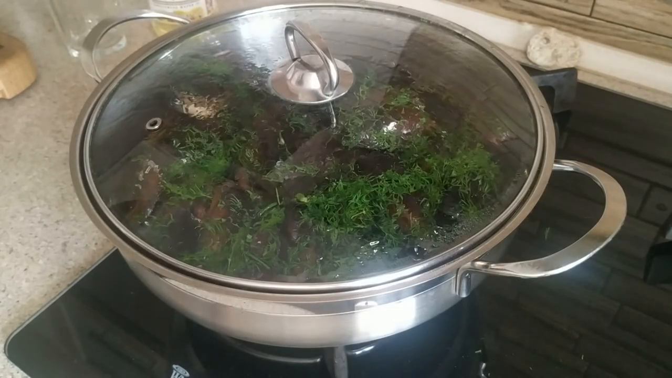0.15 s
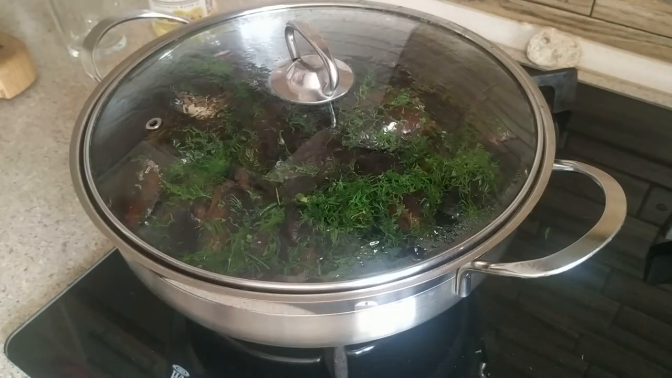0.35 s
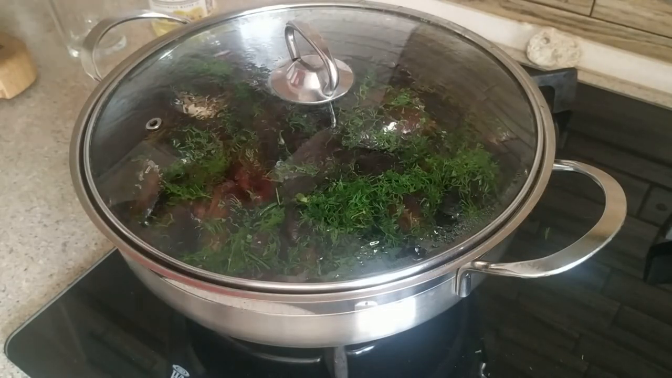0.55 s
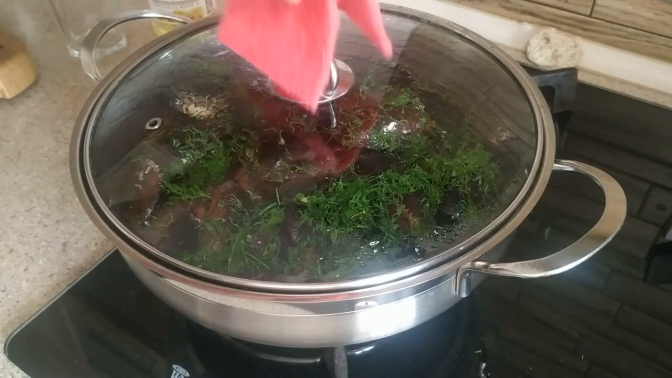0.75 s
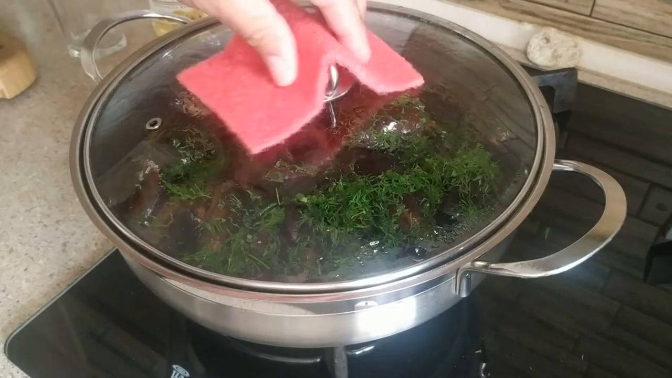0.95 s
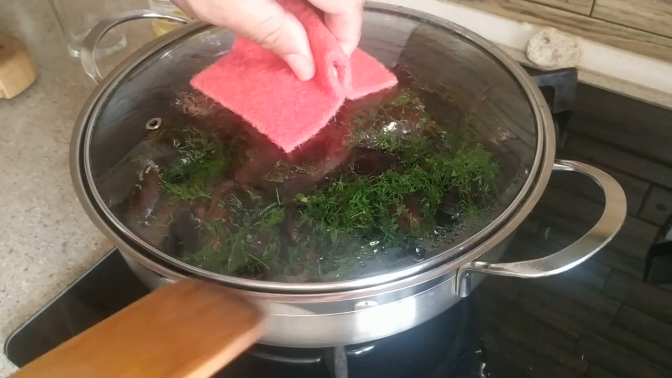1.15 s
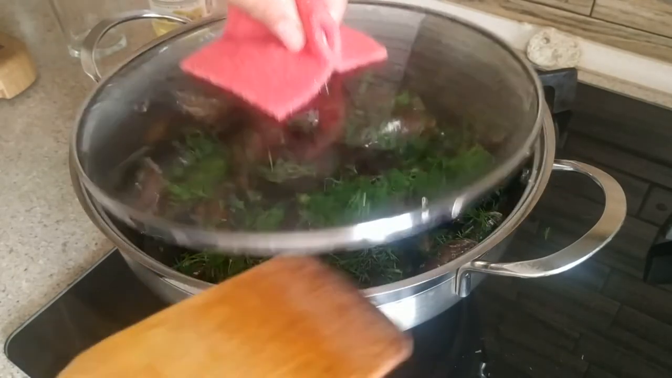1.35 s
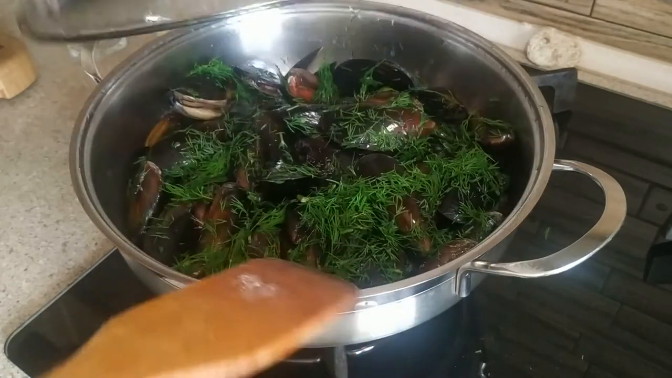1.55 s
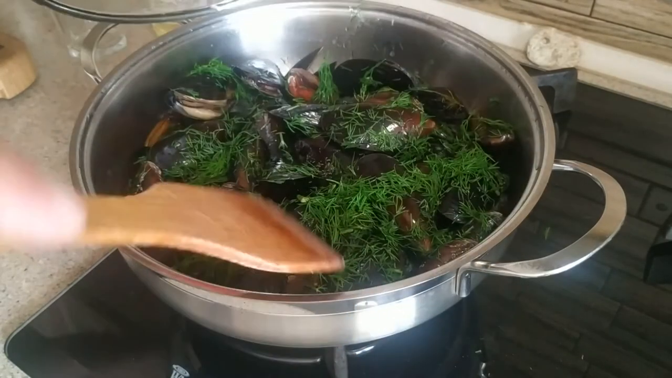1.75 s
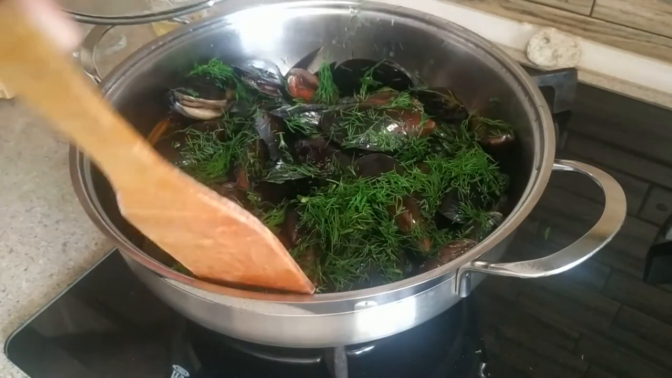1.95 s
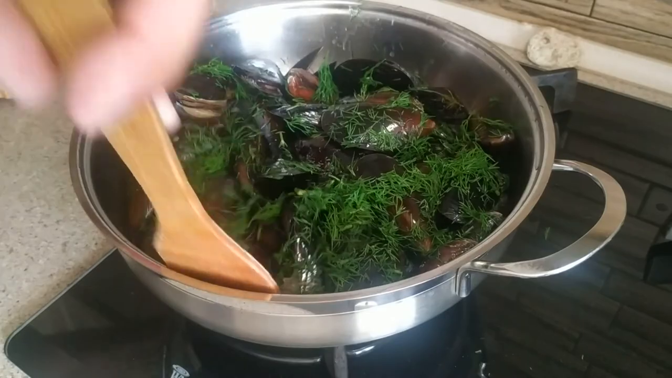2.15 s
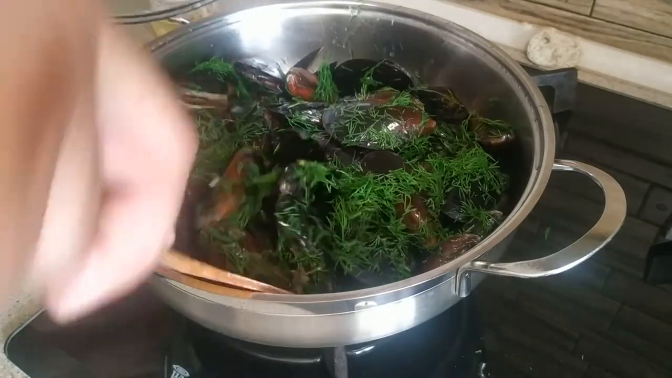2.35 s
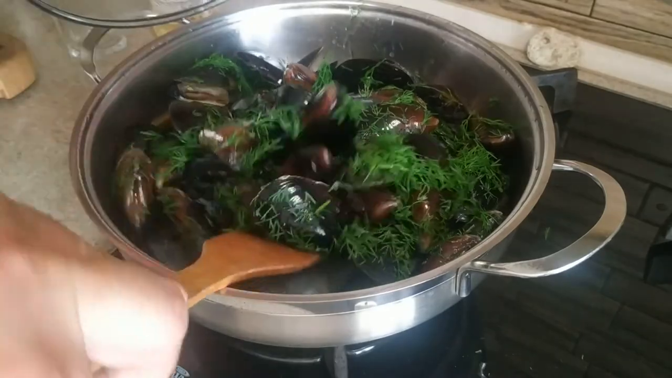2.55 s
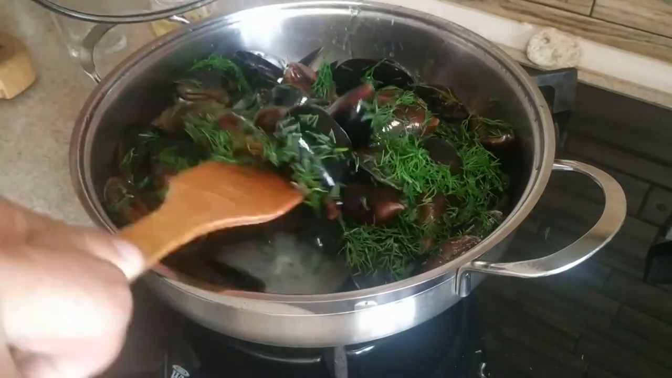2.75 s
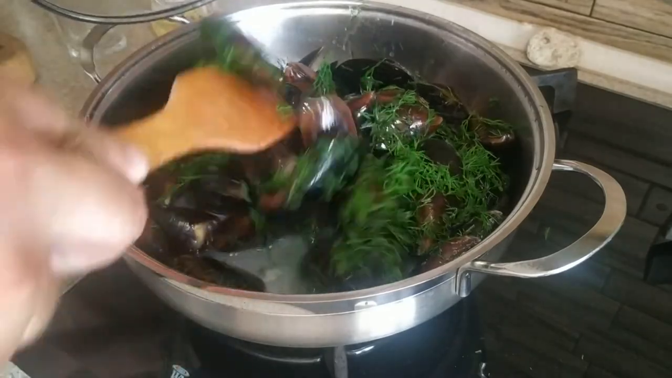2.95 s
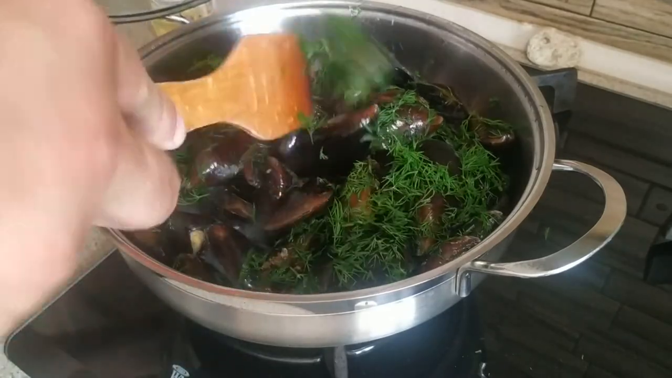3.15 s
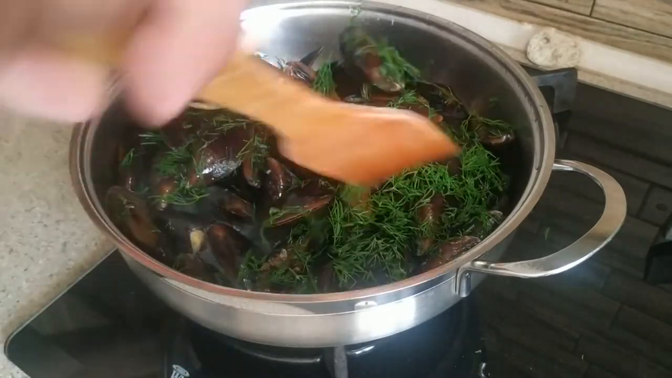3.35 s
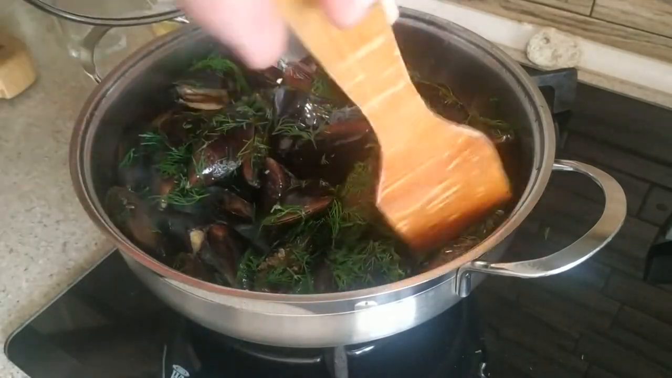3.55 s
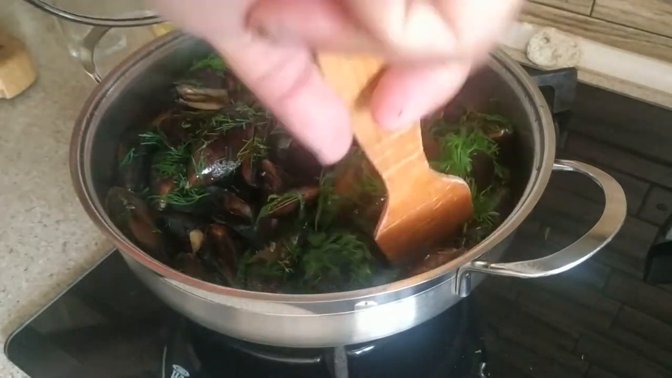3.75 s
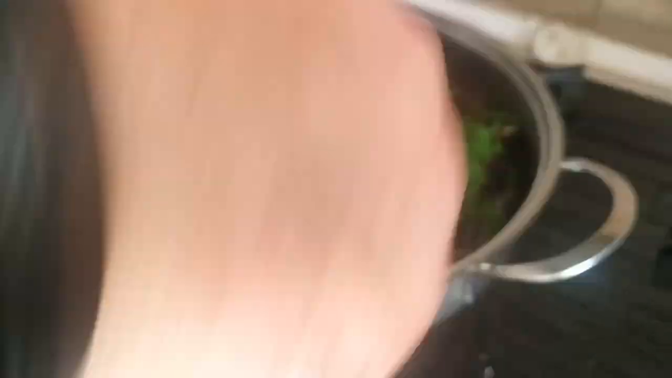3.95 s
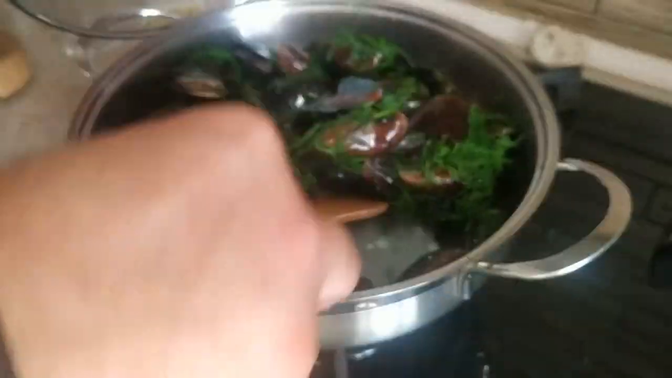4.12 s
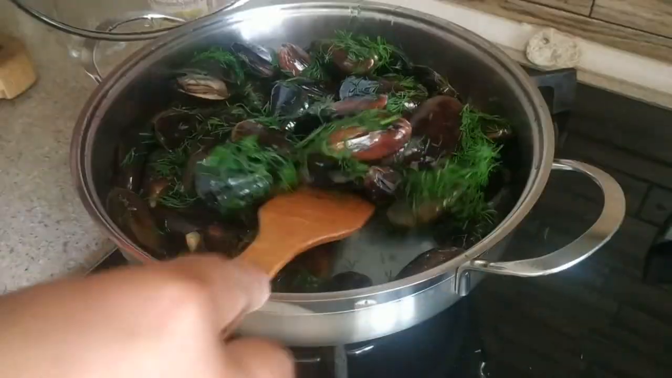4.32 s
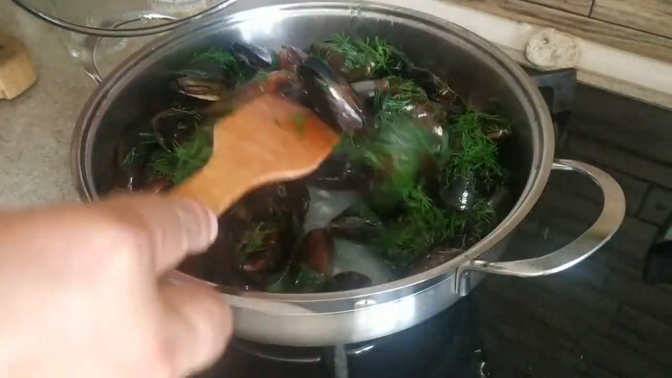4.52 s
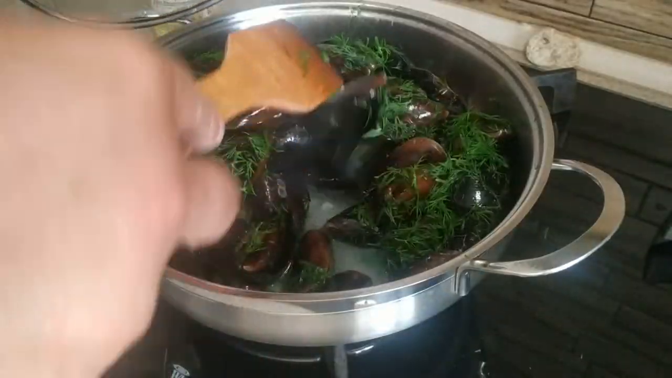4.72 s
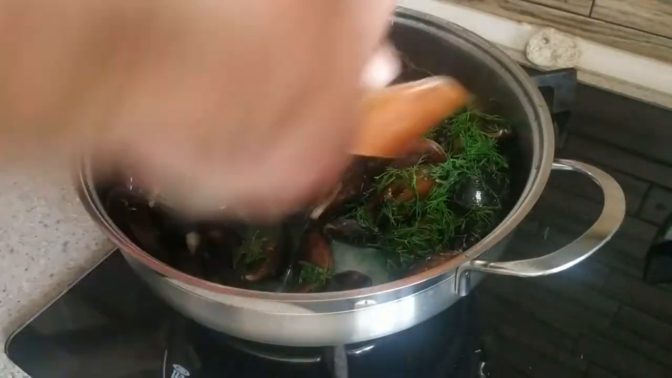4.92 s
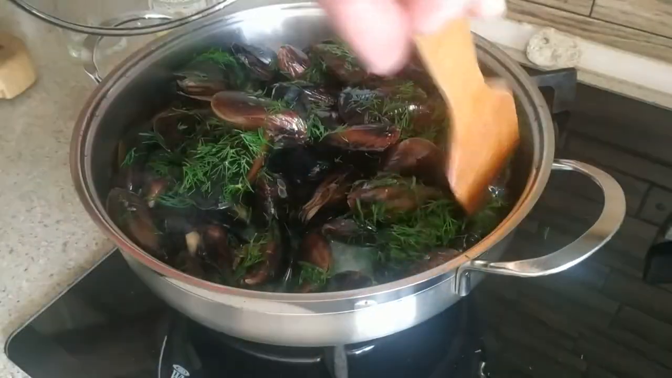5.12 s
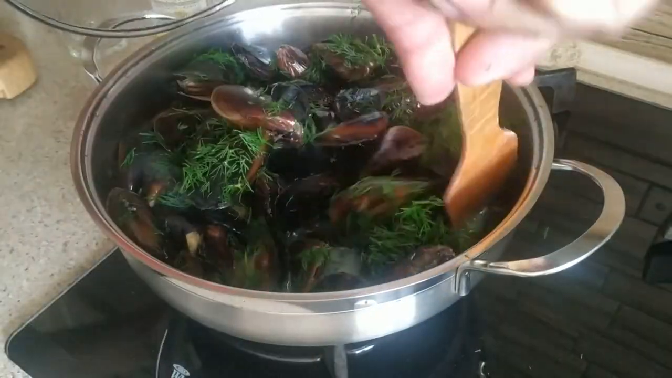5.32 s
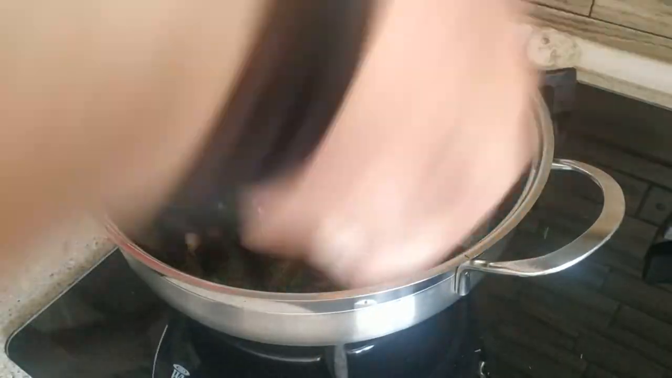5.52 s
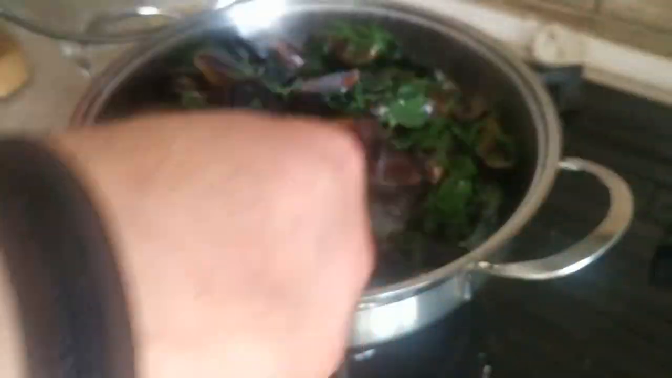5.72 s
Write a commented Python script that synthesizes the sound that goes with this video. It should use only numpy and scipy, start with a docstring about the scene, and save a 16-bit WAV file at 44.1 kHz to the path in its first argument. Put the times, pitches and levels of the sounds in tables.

```python
"""A small kitchen: a glass lid comes off a pan of simmering mussels and a wooden spatula stirs them.
Drops spit, a cloth brushes the knob, the rim scrapes, steam puffs out and the pan's air note rises.
Shells then clack and grind, the pan rumbles on the hob, and broth sizzles where the spatula bares
hot steel. Worktop and walls reflect the sound; the hob's fan runs throughout."""
import sys
import numpy as np
from scipy import signal
from scipy.fft import rfft, irfft, next_fast_len
from scipy.io import wavfile
from scipy.ndimage import uniform_filter1d, map_coordinates

SR = 44100
rng = np.random.default_rng(int(sys.argv[2]) if len(sys.argv) > 2 else 0)


def wav_out(sig):
    """Save sig, one row per channel (or a flat mono array), as 16-bit PCM at SR to the path in sys.argv[1]."""
    wavfile.write(sys.argv[1], SR, np.round(np.clip(np.atleast_2d(sig).T, -1, 1) * 32767).astype(np.int16))


N = 259308
TIME_S = np.arange(N) / SR
BINS_HZ = np.fft.rfftfreq(8192, 1 / SR)

# Spectral shapes: (frequency [Hz], relative density [dB])
FAN_SPECTRUM = [(30, -6), (110, -12.5), (175, -13.5), (320, -22.5), (680, -22.5), (950, -29), (1370, -19.5),
                (1610, -32), (2600, -33.5), (4200, -33), (5000, -25), (6200, -36.5), (9500, -29),
                (10800, -24.5), (13000, -33.5), (16000, -35.5)]
CLOTH_SPECTRUM = [(500, -17), (3000, -2), (9000, -5), (16000, -5)]
STEAM_SPECTRUM = [(150, -36), (250, -4), (414, -13), (528, -11.5), (1140, -9.5), (1700, -14), (4800, -13),
                  (16000, -17)]
THUD_SPECTRUM = [(25, 2), (70, 2), (115, 9), (165, 4), (260, -5), (400, -12), (540, 5), (1500, -43)]
FIZZ_SPECTRUM = [(2500, -14), (6500, 2), (8700, 3), (11000, 2.2), (14500, 4), (16000, -8.5)]
SPLUTTER_SPECTRUM = [(700, -18), (2000, 2), (3500, 1), (4250, 6.5), (4800, 5.5), (5400, 2), (7000, -3.5),
                     (10000, -4), (16000, -36)]
GRIND_SPECTRUM = [(120, -25), (220, 0), (300, -7), (520, 1), (1200, 0.5), (2000, -6), (3200, -14.5),
                  (6000, -42), (15000, -34)]
RUMBLE_SPECTRUM = [(20, -8), (36, -0.5), (50, -1), (64, -1), (85, 8.5), (102, -9.5), (135, -21),
                   (155, -2.5), (185, -29), (230, -6), (500, -35.5)]
# Drops on hot metal: (time [s], level [dB], t60 [s])
DROP_SPITS = [(0.4236, -47.5, 0.19), (1.668, -48.5, 0.2), (1.764, -46, 0.05), (1.811, -53, 0.08),
              (1.991, -49, 0.065), (4.487, -38, 0.013), (4.559, -23.5, 0.015)]
# Cloth on the knob: (time [s], length [s], level [dB])
CLOTH_STROKES = [(.685, 0.051, -53.5), (.76, .1, -64.5)]
# Lid rim on the pan: (time [s], length [s], level [dB])
RIM_STROKES = [(.9,0.021,-50), (1.062,0.054,-48), (1.1,0.033,-43), (1.16,0.074,-51), (1.245,0.043,-42.5),
               (1.28,0.079,-43)]
# Lid resonances: (frequency [Hz], width [Hz], relative level [dB])
LID_MODES = [(1540, 40, 1), (1853, 35, 11.5), (2540, 56, 7.5), (3520, 300, 1.5), (4670, 150, 11.5),
             (5180, 170, 8.5), (5800, 160, 3), (7460, 17000, -7)]
# Touches of lid and pan: (time [s], level [dB], frequency [Hz], width [Hz], t60 [s])
SOFT_NUDGES = [(0.927,-46.5,147,105,0.13), (.925,-54.5,679,45,0.087), (1.112,-50,130,100,0.38),
               (1.278,-34,154,201,0.12), (1.92,-46,416,221,0.03), (1.991,-45.5,578,202,0.077),
               (3.151,-34,376,202,0.036), (3.434,-47,2660,299,0.12), (4.596,-42,226,131,0.062),
               (5.197,-42,234,160,0.077), (5.335,-40,360,199,.06)]
# Opening puff, then open simmer: (time [s], steam [dB], air thud [dB])
PUFF_LEVELS = [(1.236, -57, -82), (1.268, -48, -74), (1.286, -32.5, -39), (1.32, -44, -39),
               (1.35, -42, -48), (1.41, -52.5, -55), (1.47, -58, -65), (1.7, -55, -69), (2.1, -53, -67)]
# Air note of the opening pan: (time [s], frequency [Hz], level [dB])
AIR_NOTE = [(1.282, 330, -65), (1.36, 437, -55), (1.48, 532, -54.5), (1.6, 535.7, -67), (2.1, 557, -62)]
# Broth on hot steel: (time [s], relative level [dB])
SIZZLE_LEVELS = [(1.45, -61.5), (2.07, -63), (2.16, -51), (2.3, -50), (2.55, -37.5), (2.64, -38.5),
                 (2.74, -37.5), (2.84, -45.5), (3.35, -47.5), (3.76, -49.5), (4.0, -46), (4.11, -43),
                 (4.17, -33.5), (4.3, -39), (4.42, -37.5), (4.6, -39.5), (4.78, -39.5), (4.95, -43),
                 (5.16, -45), (5.46, -46), (5.88, -48.5)]
# Spatula shoves, before each layer's gain:
# (time [s], length [s], grinding [dB], rumble [dB], splutter [dB])
SPATULA_SHOVES = [(2.12,0.071,-35,-51,-51.5), (2.185,0.24,-34,-44,-44), (2.41,0.047,-35.5,-65,-44),
                  (2.505,0.1,-32.5,-50,-42), (2.745,0.32,-32.5,-56,-40), (3.035,0.22,-41,-48.5,-39.5),
                  (3.28,0.18,-46,-54,-46.5), (3.555,0.12,-45,-45.5,-71), (3.676,0.033,-32,-38,-59),
                  (3.712,0.11,-33.5,-38.5,-46), (3.797,0.068,-38,-40.5,-52), (4.005,0.13,-31.5,-43,-41.5),
                  (4.125,0.031,-28.5,-42,-31.5), (4.44,0.057,-36.5,-47.5,-42), (4.53,0.048,-30.5,-41.5,-39),
                  (4.66,0.19,-53,-76,-62), (4.845,0.0046,-33,-57,-35), (4.95,0.15,-67,-63,-62),
                  (5.07,0.16,-44.5,-60,-67), (5.185,0.096,-37,-48,-41.5), (5.316,0.058,-31,-39,-41),
                  (5.445,0.12,-27.5,-48,-31.5), (5.52,0.15,-25.5,-48.5,-32.5), (5.73,0.17,-40.5,-56,-43.5)]
# Blows of shell on shell, wood and pan; last four columns relative to level:
# (time [s], level [dB], ring [Hz], ring [dB], hollow body [dB], crisp edge [dB], snap [dB])
SHELL_BLOWS = [(2.1213,-42.5,1170,2,3,-18,-25), (2.172,-47,1360,-6,-8,-16,-33),
               (2.1875,-35,1210,-16,5.5,-9,-20), (2.2035,-26.5,1490,-18,-21,-3.5,-21),
               (2.439,-32.5,1170,-16,-11,-25,-14), (2.5473,-32,1130,1,-16,-15,-14),
               (2.580,-41,1490,6,4,-16,-12), (2.752,-44,1570,-3,-13,-15,-20),
               (2.795,-29.5,1220,-2.5,-12,-7,-10), (2.859,-36,1720,2,-18,0,1),
               (2.897,-28,1684,-2,-13,-3,-21), (2.928,-32.5,1290,-5,-10,-28,-23),
               (2.988,-26.5,1076,-3,-5,-21,-25), (3.0462,-29,1690,-2,-8,-12,-18),
               (3.0587,-19,1840,-4.5,-9.5,-26,-15), (3.0796,-30.5,1720,-17,-5,0.5,-2),
               (3.127,-35,1790,7.5,-7,-31,-25), (3.1522,-30.5,1140,6.5,0,-13,-6),
               (3.22,-49,1100,-4,-10,-18,-22), (3.2335,-25.5,547,-20,2,-3,-30),
               (3.2775,-22.5,2155,-5,-10,-27,-11), (3.5607,-43.5,1275,10,7.5,-18,-22),
               (3.6933,-34,1700,-6,-5,3,-17), (3.7104,-24,1390,-12,0,-9,-17),
               (3.72,-22.5,1376,-2.5,-3.5,-3.5,3.5), (3.737,-20.5,2890,-8,-6,-29,-25),
               (3.759,-30.5,1260,-3,-4,-18,-25), (3.786,-34,1450,-1,0,-22,-25),
               (3.7972,-30.5,1057,3,7.5,-27,-30), (3.82,-36,3010,-3,-3,-14,-25),
               (3.992,-29.5,1700,-15,-5.5,-8,-27), (4.0173,-32,1780,-6,-3,-8,-25),
               (4.0192,-15,1770,-11,-20,-10,-33), (4.051,-23.5,1760,-12,-11,-12,-24),
               (4.0795,-23.5,2580,-4.5,-26,-10,-31), (4.127,-38.5,2060,-3,-11,5,13),
               (4.147,-20.5,1160,-3.5,-21,-19,-14), (4.177,-33,2350,-4,-10,3,-12),
               (4.1949,-21,1270,-8,-14,-15,-13), (4.2058,-30.5,4070,6.5,-4,5.5,-2),
               (4.368,-34.5,1740,2,-4,-11,-5), (4.445,-33.5,2640,2,3.5,-14,-15),
               (4.5092,-25.5,2060,-4,-11,10.5,6.5), (4.549,-31.5,880,-3,4,2,2),
               (4.5974,-11,1800,-26,-11,-35,-14.5), (4.640,-36,1150,-3,2,-20,-18),
               (4.776,-42.5,1040,4,13.5,-30,-15), (4.8463,-19.5,2420,2,-27,-16,3.5),
               (4.847,-31,1760,1.5,-6,-13,-13), (5.109,-42.5,1870,6,-12,-13,-18),
               (5.176,-46.5,1030,5,11,-20,-25), (5.213,-40,1450,4,-11,-18,-25),
               (5.221,-23,1170,0,-3,-15,-24), (5.2496,-27.5,1640,-5,-28,-24,-22),
               (5.3348,-31.5,1540,1,1,-30,-28), (5.3395,-31.5,956,11,9,-30,-28),
               (5.344,-27,1056,7,-0.5,-31,-30), (5.3685,-28,1030,-6,-10,-13,-18),
               (5.403,-27,2970,-3,-22,-12,-24), (5.441,-19.5,3000,-10,-13,3,0),
               (5.466,-28.5,2700,-2,-18,4.5,-22), (5.492,-31.5,1855,5,4,-18,-19),
               (5.5107,-25.5,2320,-1,-10,-6,-18), (5.537,-31,1430,-9,-15,6,11.5),
               (5.541,-25,3970,-1,-8,7,-5), (5.5566,-22,1750,-9,-9,-9,-8),
               (5.645,-23.5,1460,-18,-4,-14,-21), (5.6779,-24,3160,1,-21,-14,-29),
               (5.7277,-18.5,1720,-23,-13,-6,-25), (5.833,-39.5,1064,-2,-2,-10,7.5)]
# Loaded pan resonances: (frequency [Hz], width [Hz], lift [dB])
PAN_MODES = [(368.6, 24, 8.5), (468.5, 22, 5.5), (625, 29, 4), (795, 170, -5.5), (1090, 77, 3.5),
             (1027, 25, 3.5), (1616, 185, 1), (5650, 490, 2.5)]
# Kitchen decay: (frequency [Hz], t60 [s])
ROOM_DECAY = [(150, 0.22), (550, 0.26), (4000, 0.21), (14000, 0.17)]
# Stereo width: (frequency [Hz], side gain [dB])
SIDE_GAIN = [(30, -4), (70, -29), (140, -10.5), (350, -9.5), (700, -6), (1400, -0.5), (16000, 0.5)]


def amp(db):
    """Decibels to gain."""
    return 10 ** (np.asarray(db) / 20)


def unit(x):
    """Scale to rms 1."""
    return x / np.sqrt(np.mean(x ** 2) + 1e-20)


def unit_blow(x):
    """Scale the loudest 4 ms to rms 1."""
    return x / np.sqrt(uniform_filter1d((x ** 2).mean(0), size=176).max() + 1e-20)


def curve(points, hz=BINS_HZ):
    """Interpolate over log frequency."""
    knots_hz, values = np.transpose(points)
    return np.interp(np.log(hz + 1), np.log(knots_hz + 1), values)


def envelope(rows, column=1):
    """Gain from one dB column, fading out beyond its rows."""
    rows = np.array(rows)
    knots_s = np.r_[rows[0, 0] - .05, rows[:, 0], rows[-1, 0] + .1]
    return amp(np.interp(TIME_S, knots_s, np.r_[-100, rows[:, column], -100]))


def strokes(rows, attack_s, sag_db_per_s, t60_s, column=2):
    """Gain of hand strokes: take hold, ease off, die away."""
    power = np.zeros(N)
    for row in rows:
        age_s, length_s = np.maximum(TIME_S - row[0], 0), row[1]
        sag_db = sag_db_per_s * np.minimum(age_s, length_s)
        release_db = 60 * np.maximum(age_s - length_s, 0) / t60_s
        attack = np.minimum(age_s / attack_s, 1)
        power += (attack * amp(row[column] - np.minimum(sag_db + release_db, 200))) ** 2
    return np.sqrt(power)


def shoves(column, rest_db):
    """Gain of the spatula shoves, over a bed that follows the sizzle."""
    pushes = strokes(SPATULA_SHOVES, attack_s=0.0031, sag_db_per_s=28.5, t60_s=0.22, column=column)
    return np.hypot(pushes, amp(rest_db) * envelope(SIZZLE_LEVELS))


def add(mix, start_s, sound):
    """Mix in a stereo sound."""
    part = mix[:, round(start_s * SR):][:, :sound.shape[1]]
    part += sound[:, :part.shape[1]]


def colour(x, gain_db):
    """Minimum-phase filter, gain given at BINS_HZ."""
    log_gain = np.log(amp(np.maximum(gain_db, -100)))
    log_response = np.conj(signal.hilbert(np.r_[log_gain, log_gain[-2:0:-1]]))
    taps = np.fft.ifft(np.exp(log_response)).real
    return signal.oaconvolve(x, taps[None, :len(BINS_HZ)], axes=1)[:, :x.shape[1]]


def band(x, low_hz, high_hz):
    """Causal band-pass."""
    return signal.sosfilt(signal.butter(2, [low_hz, high_hz], "band", fs=SR, output="sos"), x)


def resonance(hz, width_hz):
    """Power response of one mode."""
    return 1 / (1 + (2 * (BINS_HZ - hz) / width_hz) ** 2)


def noise(spectrum_db):
    """Shaped stereo noise, rms 1."""
    return unit(colour(rng.standard_normal((2, N)), spectrum_db))


def flicker(depth_db, per_s):
    """Random gain; depth is rms."""
    knots = rng.standard_normal(4096)
    return amp(depth_db * unit(np.interp(TIME_S * per_s, np.arange(len(knots)), knots)))


def shifting(x, depth_db, width_hz, hold_s):
    """Contacts and gaps move, so resonances come and go; rms 1."""
    hz, t, spectra = signal.stft(x, SR, nperseg=512)
    field = rng.standard_normal((256, 512))
    grid = np.meshgrid(hz / width_hz, t / hold_s, indexing="ij")
    patches = map_coordinates(field, grid, order=1, mode="wrap")
    return unit(signal.istft(spectra * amp(depth_db * patches), SR, nperseg=512)[1][:, :N])


def clicks(per_s, spread_db):
    """Random impulses: many small, a few large."""
    size = amp(spread_db * np.minimum(rng.exponential(1, N), 4))
    return size * rng.choice([-1, 1], N) * (rng.random(N) < per_s / SR)


def ring(t, hz, t60_s):
    """Uneven decaying modes, each with its own phase per channel."""
    out = np.zeros((2, len(t)))
    for ratio, db in [(1, 8.5), (1.47, -3), (2.2, -3)]:
        if hz * ratio < SR / 2:
            cycles = hz * ratio * t + rng.uniform(-0.26, 0.41, (2, 1))
            out += amp(db - 60 * t * ratio / max(t60_s, .002)) * np.sin(2 * np.pi * cycles)
    return out


def grains(pitches_hz, per_s, ring_cycles, grit_db):
    """Small random hits, each a scratch and a brief ring."""
    out, t = np.zeros((2, N)), np.arange(SR // 20) / SR
    for hz in pitches_hz:
        tone = unit(ring(t, hz * rng.uniform(1.0, 1.03), ring_cycles / hz))
        scratch = unit(rng.standard_normal((2, len(t))) * amp(-60 * t / 0.00032))
        hits = clicks(per_s / len(pitches_hz), spread_db=4)
        out += signal.oaconvolve(hits[None], tone + amp(grit_db) * scratch, axes=1)[:, :N]
    return out


def fan(level_db=-54):
    """Steady rush of the hob's fan."""
    return amp(level_db) * noise(curve(FAN_SPECTRUM))


def spits(snap_db=7, snap_s=0.001):
    """A drop snaps, flashes to steam and dies away."""
    flash = np.zeros(N)
    for start_s, db, t60_s in DROP_SPITS:
        age_s = np.maximum(TIME_S - start_s, 0)
        snap = amp(snap_db) * np.exp(-age_s / snap_s)
        flash += amp(db - 60 * age_s / t60_s) * (1 + snap) * (TIME_S > start_s)
    steam = band(noise(-2 * np.log2(1 + BINS_HZ / 1000)), 220, 21000)
    return flash * unit(steam * flicker(depth_db=2, per_s=320))


def cloth():
    """Fibres drag over the steel knob with a dry rustle."""
    rustle = noise(curve(CLOTH_SPECTRUM)) * flicker(depth_db=2, per_s=200)
    return rustle * strokes(CLOTH_STROKES, attack_s=0.044, sag_db_per_s=30, t60_s=0.44)


def lid_scrape():
    """The rim catches on the pan; dense clicks ring the lid's modes."""
    power = sum(amp(db) ** 2 * resonance(hz, width_hz) for hz, width_hz, db in LID_MODES)
    catches = np.array([clicks(per_s=2500, spread_db=db) for db in (2.1, 3.1)])
    rim = shifting(colour(catches, 10 * np.log10(power)), depth_db=4, width_hz=300, hold_s=.025)
    rim = unit(rim * flicker(depth_db=2.2, per_s=140))
    return rim * strokes(RIM_STROKES, attack_s=0.025, sag_db_per_s=49, t60_s=0.35)


def nudges():
    """Dull touches of lid and pan, one resonance each."""
    out, t = np.zeros((2, N)), np.arange(SR // 3) / SR
    for start_s, db, hz, width_hz, t60_s in SOFT_NUDGES:
        touch = rng.standard_normal((2, len(t))) * amp(-60 * t / t60_s)
        bump = colour(touch, 40 * np.log10(resonance(hz, width_hz)))
        add(out, start_s, amp(db) * unit_blow(bump))
    return out


def steam_puff():
    """Steam bursts from under the lid with a thud of air."""
    rush = noise(curve(STEAM_SPECTRUM)) * envelope(PUFF_LEVELS) * flicker(depth_db=2.3, per_s=120)
    thud = noise(curve(THUD_SPECTRUM)) * envelope(PUFF_LEVELS, column=2)
    return rush + thud


def air_note(width_hz=140):
    """The pan's hollow note rises as the gap widens."""
    knots_s, hz, _ = np.transpose(AIR_NOTE)
    cycles = np.cumsum(np.interp(TIME_S, knots_s, hz)) / SR
    breath = noise(20 * np.log10(resonance(0, width_hz)))
    return unit(breath * np.sin(2 * np.pi * cycles)) * envelope(AIR_NOTE, column=2)


def bubbles(spectrum, pitches_hz, per_s, mist_db):
    """Tiny bubbles pop in flurries over a mist of smaller ones."""
    pops = grains(pitches_hz, per_s, ring_cycles=20, grit_db=-1)
    flurries = flicker(depth_db=1.4, per_s=38)
    foam = unit(colour(pops, curve(spectrum))) + amp(mist_db) * noise(curve(spectrum))
    return shifting(foam * flurries, depth_db=3, width_hz=400, hold_s=.05)


def sizzle(fizz_left_db=2.5, fizz_right_db=1.5, splutter_db=-1, surge_db=-8):
    """Thin broth films fizz, thick ones splutter; both surge as a shove bares hot steel."""
    bared = shoves(column=4, rest_db=-6.5)
    fizz = bubbles(FIZZ_SPECTRUM, np.linspace(7000, 15500, 32), per_s=1700, mist_db=0)
    splutter = bubbles(SPLUTTER_SPECTRUM, np.linspace(2000, 7500, 32), per_s=1100, mist_db=-3)
    fizz *= np.hypot(envelope(SIZZLE_LEVELS), amp(surge_db) * bared)
    return amp([[fizz_left_db], [fizz_right_db]]) * fizz + amp(splutter_db) * splutter * bared


def grinding(gain_db=-4, scrape_db=-11, crunch_db=-3):
    """Shells catch and slip, some with a hollow crunch, over the scrape of wood on steel."""
    slips = grains(np.geomspace(480, 4200, 48), per_s=650, ring_cycles=41.5, grit_db=-5)
    slips = unit(colour(slips, curve(GRIND_SPECTRUM) + 10 * np.log10(1 + BINS_HZ / 1000)))
    scrape = amp(scrape_db) * noise(curve(GRIND_SPECTRUM))
    crunch = unit(grains(np.geomspace(700, 3000, 24), per_s=130, ring_cycles=18, grit_db=-9))
    heap = shifting(slips + scrape + amp(crunch_db) * crunch, depth_db=3, width_hz=260, hold_s=.045)
    clumps = unit(heap * flicker(depth_db=1.5, per_s=60))
    return amp(gain_db) * clumps * shoves(column=2, rest_db=-2.5)


def pan_rumble(gain_db=3):
    """The shoved pan rumbles on the hob."""
    return amp(gain_db) * noise(curve(RUMBLE_SPECTRUM)) * shoves(column=3, rest_db=-19)


def clacks(rattle_db=-22, rattle_t60_s=0.034, ring_t60_s=0.031, contact_db=10.5, knock_db=-2):
    """Each blow cracks through the heap, rings a shell and sounds the pan's hollow body."""
    out, t = np.zeros((2, N)), np.arange(SR // 6) / SR
    for start_s, db, ring_hz, ring_db, body_db, edge_db, snap_db in SHELL_BLOWS:
        crack_t60_s = 0.026 * amp(0.047 * edge_db)  # crisp blows crumble on longer
        decay = amp(-60 * t / crack_t60_s) + amp(rattle_db - 60 * t / rattle_t60_s)
        crack = rng.standard_normal((2, len(t))) * decay
        crack[0, 4 + rng.integers(0, 5)] += amp(contact_db)  # left lags by 0-4 samples
        crack[1, 4] += amp(contact_db)
        crack[:, :20] += amp(-1) * np.hanning(20)  # brief push, alike in both channels
        knock = amp(knock_db) * unit_blow(band(crack, 1250, 3260))
        shell = amp(ring_db) * unit_blow(ring(t, ring_hz, ring_t60_s))
        body = amp(body_db) * unit_blow(band(crack, 487, 945))
        edge = amp(edge_db) * unit_blow(band(crack, 3400, 9650))
        snap = amp(snap_db) * unit_blow(band(crack, 6700, 13800))
        add(out, start_s, amp(db) * (knock + shell - body - edge + snap))
    return out


def kitchen(x, gain_db=-3.5, gap_s=0.00052):
    """Dense reflections off worktop and walls; each band has its own decay."""
    taps = rng.standard_normal((2, SR // 2)) * (rng.random((2, SR // 2)) < .08)
    hz, t, spectra = signal.stft(taps, SR, nperseg=256)
    decay = amp(-60 * t / curve(ROOM_DECAY, hz)[:, None])
    tail = signal.istft(spectra * decay, SR, nperseg=256)[1]
    tail *= np.clip(np.arange(tail.shape[1]) / SR / gap_s - 1, 0, 1)
    return amp(gain_db) * signal.fftconvolve(x, tail / np.linalg.norm(tail[0]), axes=1)[:, :N]


def scene():
    """Shells sound through the pan; all but rumble and fan rings in the kitchen."""
    pan_db = sum(db * resonance(hz, width_hz) for hz, width_hz, db in PAN_MODES)
    shells = colour(clacks() + grinding(), pan_db)
    near = shells + sizzle() + spits() + nudges() + cloth() + lid_scrape() + steam_puff() + air_note()
    return near + kitchen(near) + pan_rumble() + fan()


def record(dry):
    """Two close microphones hear the bass alike; peaks clip; low-pass at 16.1 kHz."""
    mid, side = (dry[0] + dry[1]) / 2, (dry[0] - dry[1]) / 2
    size = next_fast_len(N)
    side_gain = amp(curve(SIDE_GAIN, np.fft.rfftfreq(size, 1 / SR)))
    side = irfft(rfft(side, size) * side_gain, size)[:N]
    clipped = np.clip([mid + side, mid - side], -1, 1)
    low_pass = signal.firwin(511, 16100, window=("kaiser", 9), fs=SR)
    return signal.oaconvolve(clipped, low_pass[None], "same")


dry = scene()
out = record(dry)
wav_out(out)
```